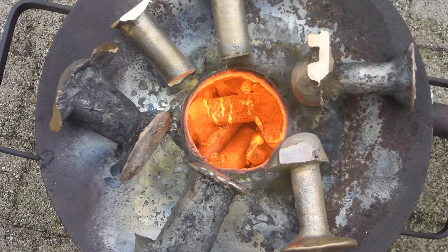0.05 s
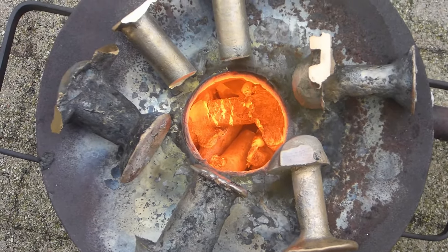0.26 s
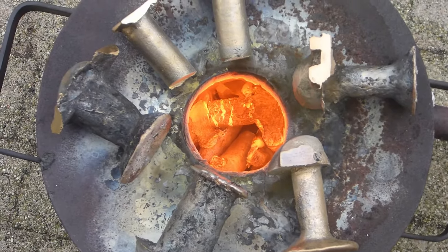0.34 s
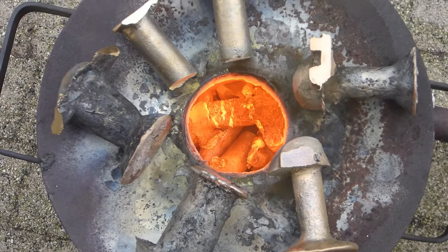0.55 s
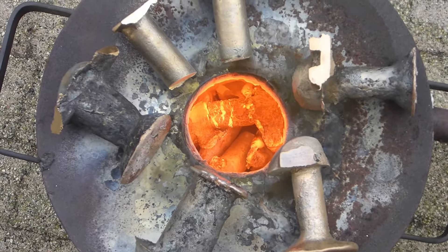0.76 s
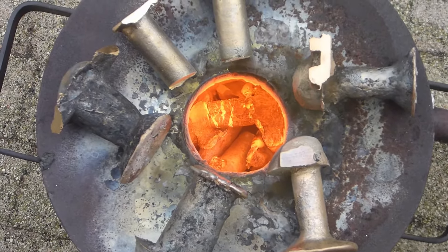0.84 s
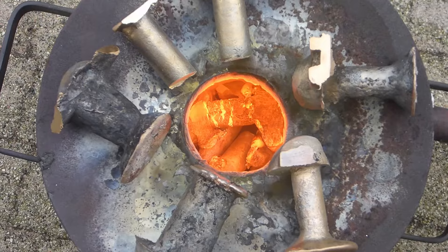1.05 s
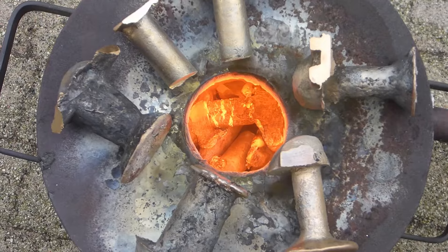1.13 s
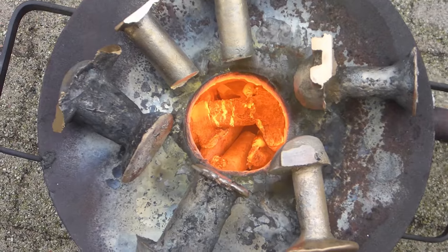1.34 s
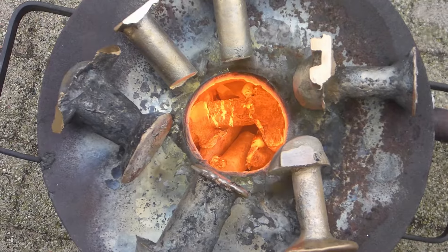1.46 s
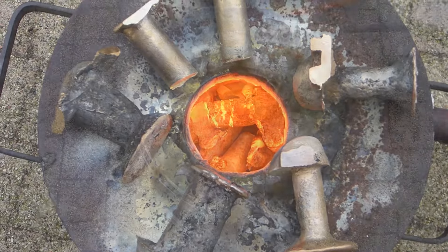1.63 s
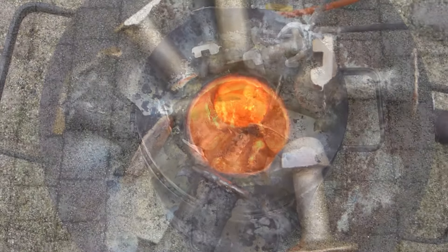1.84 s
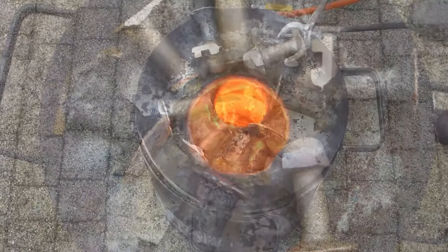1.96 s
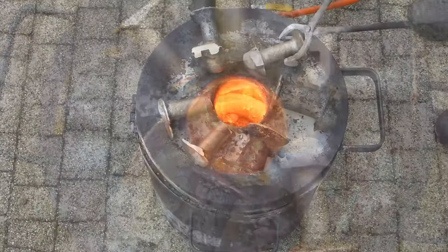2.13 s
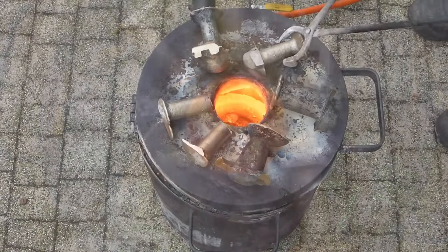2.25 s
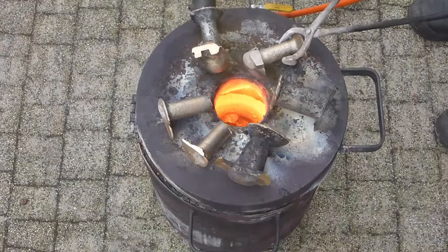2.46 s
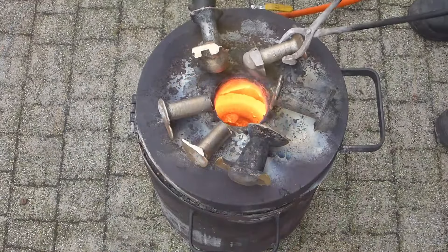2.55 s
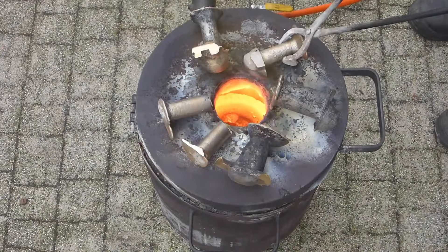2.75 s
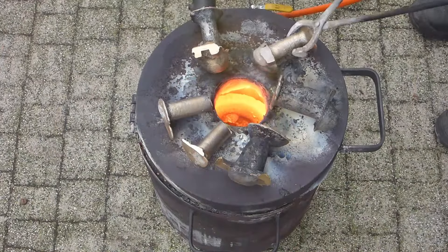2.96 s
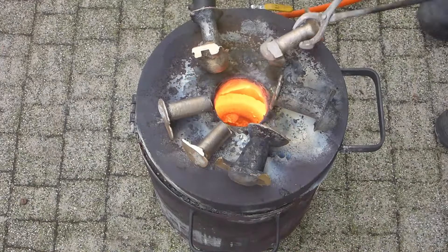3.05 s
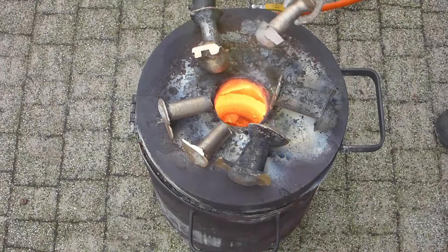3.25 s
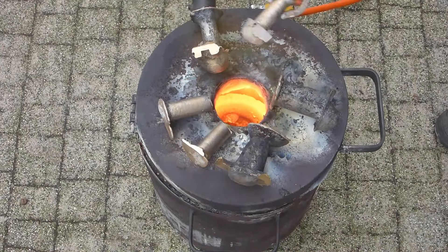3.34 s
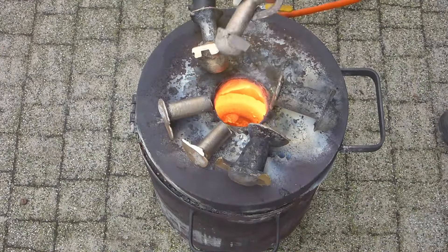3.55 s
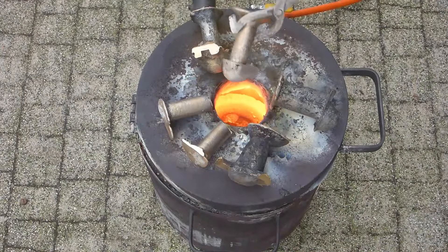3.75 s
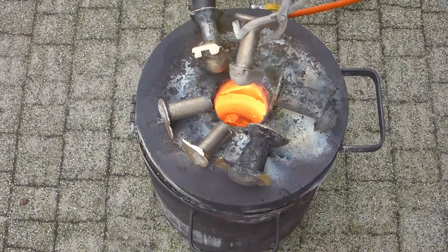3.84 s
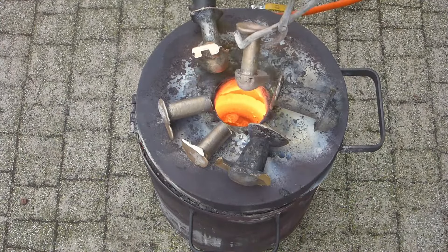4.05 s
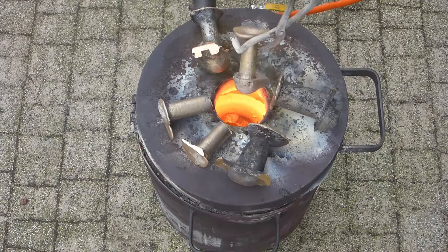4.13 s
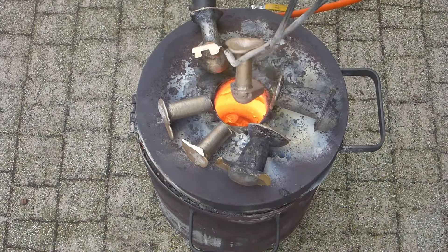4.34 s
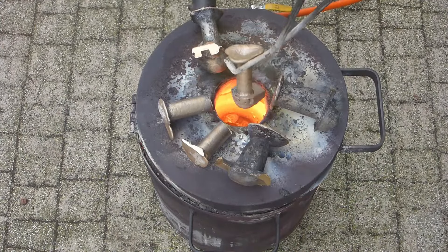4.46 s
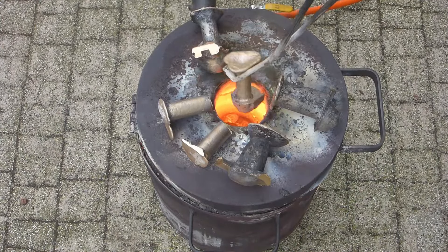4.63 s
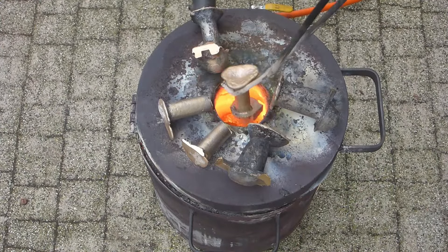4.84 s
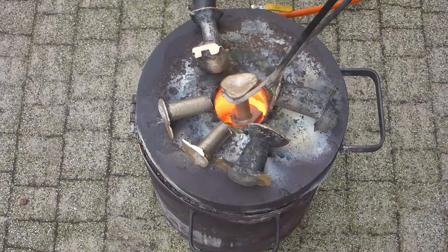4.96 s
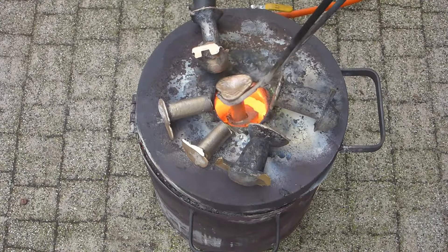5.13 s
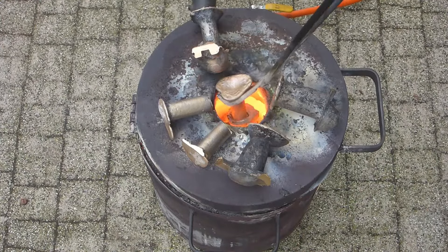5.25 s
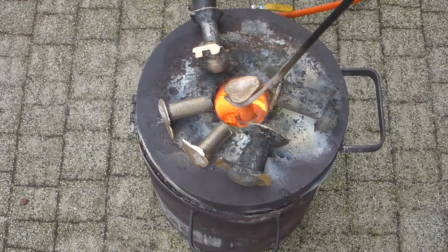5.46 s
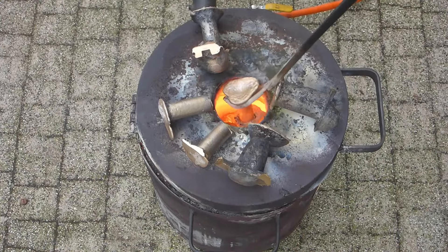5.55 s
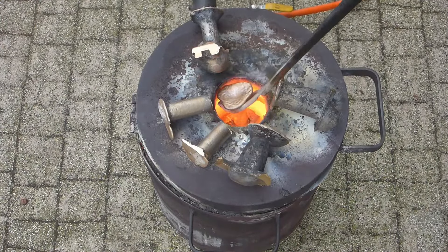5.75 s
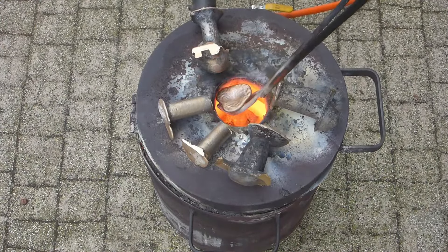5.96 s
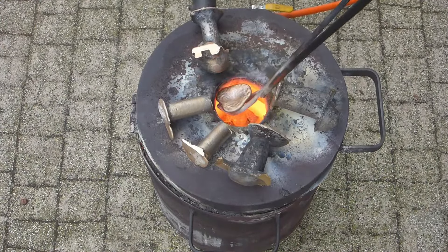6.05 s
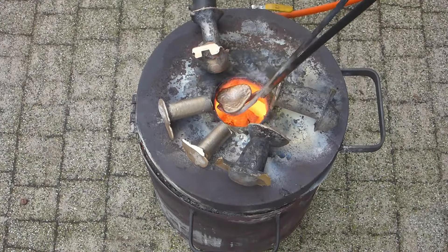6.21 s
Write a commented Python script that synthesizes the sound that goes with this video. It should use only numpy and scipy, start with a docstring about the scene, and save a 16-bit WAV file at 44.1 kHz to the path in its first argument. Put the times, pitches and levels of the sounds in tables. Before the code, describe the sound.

A gas burner roars without pause in a small steel furnace in a paved yard. The microphone is first right above the lid opening, where the boom is deep and smooth, then blends to a step back at about two seconds, with more rasp. A short gritty metal scrape comes near four seconds and a dull double tong knock just after five. Soft jet hiss and very faint bird chirps lie around it.

```python
"""A gas burner roars in a small steel furnace: the flame booms and rasps out of the lid hole as shaped
noise, with one changing rebound. It is heard first right over the lid, then a step back. The gas jet rings
the burner tube, hisses and whistles as filtered noise. Scrap scrapes on the lid and tongs tick as noise
through the iron's damped modes. A small bird calls faintly with rising sine pairs and short echoes."""
import sys
import numpy as np
from scipy import signal
from scipy.fft import rfft, irfft, next_fast_len
from scipy.io import wavfile
from scipy.ndimage import uniform_filter1d, minimum_filter1d

SR = 44100
rng = np.random.default_rng(int(sys.argv[2]) if len(sys.argv) > 2 else 0)


def put_to_file(sound):
    """Save the sound as 16-bit audio at rate SR, in the file named by the first command-line argument."""
    columns = np.atleast_2d(sound).T  # one column per channel
    safe = np.clip(columns, -1, 1)
    whole_steps = np.round(safe * 32767)
    wavfile.write(sys.argv[1], SR, whole_steps.astype(np.int16))


N = 440549
TIME, BINS = np.arange(N) / SR, np.fft.rfftfreq(next_fast_len(N), 1 / SR)  # s, Hz

# Listening place: t/s, nearness (1 over the lid, 0 a step back), left minus right of the boom/dB
PLACE = [(0, 1, -.1), (1.65, 1, -.1), (2.2, 0, 1.9), (2.8, 0, 1.8), (4.2, 0, .8), (5.4, 0, 0),
         (9.99, 0, -.1)]

# Bird calls: t/s, level/dB, length/s, pitch approached f/Hz
BIRD_CALLS = [(1.879, -56, .014, 6800), (3.3075, -43, .015, 6700), (6.4238, -38.5, .023, 7600),
              (7.458, -50, .015, 6700), (9.7125, -46.5, .015, 6700)]
# Call paths, direct, off paving, off walls: delay/s, level/dB
BIRD_PATHS = [(0, 0), (.0013, -9), (.0037, -10), (.0105, -19), (.031, -14), (.035, -17)]

# Scrap touching the lid: t/s, level before trim/dB, decay t60/s, favoured f/Hz
SCRAPES = [(1.9645, -42, .025, 2000), (3.8552, -32, .04, 2800), (3.8578, -29, .025, 6300),
           (3.8605, -33, .05, 1800), (3.861, -37, .07, 11500), (3.8635, -30.5, .035, 5200),
           (3.8695, -30, .045, 2100), (3.87, -38, .03, 9500), (3.874, -33, .035, 4000)]
# Modes of the scrap: f/Hz, width/Hz, level/dB
SCRAP_MODES = [(1400, 400, -7), (1950, 170, 0), (2240, 110, 0), (3520, 240, -2), (4000, 170, -4),
               (4400, 120, -1), (5500, 100, -5), (6710, 300, 0), (7150, 150, -1), (8100, 400, -7),
               (10500, 900, -6), (11800, 700, -5)]
# Tongs knocking and shifting: t/s, level before trim/dB, decay t60/s, favoured f/Hz
KNOCKS = [(2.6535, -32, .022, 1300), (2.93, -42, .06, 1900), (2.958, -36, .04, 1500),
          (2.9585, -36.5, .04, 2700), (3.0975, -30, .025, 1650), (5.2222, -29.5, .04, 1450),
          (5.2232, -37, .05, 6500), (5.2265, -26.5, .035, 2550), (5.2315, -35.5, .035, 4200),
          (6.4085, -41, .045, 2000), (8.2295, -41, .02, 11000)]
# Modes of the tongs: f/Hz, width/Hz, level/dB
TONGS_MODES = [(1250, 250, -4), (1610, 170, -3), (2030, 170, -3), (2550, 170, 0), (3050, 450, -7),
               (3450, 250, -9), (4050, 170, -5), (4400, 250, -9), (5500, 400, -14), (6750, 500, -7),
               (12600, 1400, -14)]
# Tongs dragging over the rim, one row: middle t/s, 1/e width/s, level/dB, grain rate/(1/s)
TONGS_DRAG = (8.213, .11, -52.5, 260)
BLOW_DB_PER_OCTAVE = 13  # loss away from the favoured pitch

# Air resonances of the tube: f/Hz, width/Hz, level a step back/dB, level over the lid/dB; before ring trim
TUBE_MODES = [(1625, 66, -6, -7), (2257.7, 68, -7.5, -5.5), (2830, 190, -9.5, -16),
              (3291, 165, -8.5, -11.5), (3903, 170, -11, -10), (4480, 66, -16, -12.5),
              (5470, 170, -26.5, -26.5)]
# Rush between the resonances: f/Hz, relative density/dB
RUSH_SPECTRUM = [(500, -14), (1300, -3), (1900, -11), (2600, -15), (3600, -19.5), (4250, -14.5),
                 (4900, -20), (5600, -20.5), (7000, -35.5), (10000, -63)]
# Nozzle hiss: f/Hz, relative density/dB
HISS_SPECTRUM = [(3000, -30), (5100, -18), (5400, -12), (5900, -9), (6450, 0), (7000, 0), (7400, -5.5),
                 (7580, -3), (7780, -9.5), (8100, -12), (9700, -11), (10600, -13), (11500, -8.5),
                 (12700, -21), (13350, -17), (13800, -32), (15000, -36)]
# Jet laws, one row each: level/dB, change over the lid/dB, flame slope/(dB/dB), surge slope/(dB/dB)
RUSH_LAW = (-54, 1.5, 0.53, 0.86)
HISS_LAW = (-59, -4, 0.67, 1.5)
WHISTLE_LAW = (-63.5, 0, 0.5, 0.9)
# Gas flow surges and lulls: crest t/s, 1/e width/s, strength before the slopes/dB
SURGES = [(0.018, 0.18, 4), (0.603, 0.14, 3), (.95, .25, -1.5), (1.172, 0.16, 3), (1.803, 0.28, -2),
          (2.44, 0.24, 1.5), (2.921, .18, 2), (3.208, 0.094, -3), (3.6, 0.68, 2.2), (3.981, .1, 3.5),
          (4.743, 0.7, 3), (5.55, 0.92, 1.5), (6.25, 0.61, 2), (7.09, .14, 2), (7.678, .1, 1),
          (8.197, 0.14, 2), (8.62, 0.15, -1.5), (9.872, 0.22, 3.5)]
# One tube resonance sings out or fades: crest t/s, 1/e width/s, strength/dB, f/Hz
SINGS = [(.24, .09, 5, 2259), (.575, .09, 5.5, 4475), (.585, .08, 4, 3897), (.65, .14, 7.5, 3287),
         (1.15, .2, -3, 4475), (1.2, .1, 3, 3897), (1.24, .15, 6.5, 3287), (1.41, .1, 6, 4475),
         (1.61, .1, 4, 4475), (2.45, .45, 3.5, 2820), (3.35, .4, -3, 2820), (3.5, .12, 5, 4475),
         (4.12, .1, -5, 2259), (4.69, .08, 4, 3897), (5.15, .8, 4, 2820), (5.85, .3, -3, 2820),
         (7.33, .1, 4, 1628), (8.06, .12, 4, 3897)]
# Jet locks into a louder whistle: start t/s, length/s, level before trim/dB
FLARES = [(0.016, 0.064, -52), (0.579, 0.042, -54), (2.45, 0.037, -54), (2.648, 0.032, -56),
          (3.524, 0.093, -53), (4.025, 0.046, -51), (4.23, 0.064, -57), (4.693, 0.046, -57),
          (5.988, 0.15, -53.5), (6.37, 0.093, -55), (6.554, 0.11, -57), (7.203, 0.03, -53),
          (8.138, 0.041, -56), (9.793, 0.03, -55)]
WHISTLE_HZ, WHISTLE_WIDTH_HZ, FLARE_EDGE_S = 11005, 85, .02
CREST_HZ, OFF_CREST_DB = 3900, 10.5  # over the lid a surge drives this pitch most; loss per octave away
WAVER_DB = 1.9  # rms waver of each resonance

# Flame: t/s, boom level/dB, rasp level/dB; both before trim
FLAME = [(0, -11.5, -35), (1.5, -12, -36.5), (1.8, -13.5, -39), (2.05, -15, -31.5), (2.5, -9.5, -28),
         (3.1, -10.5, -28), (3.35, -12.5, -31), (3.85, -12.5, -30.5), (4.7, -11, -33.5), (5, -12.5, -37),
         (5.35, -12, -32.5), (5.95, -13.5, -35), (6.4, -12.5, -31), (7.7, -12, -32.5), (8.2, -13, -29.5),
         (8.72, -14.5, -35.5), (9.2, -11, -32), (9.99, -13, -31.5)]
# Roar over the lid: f/Hz, relative density/dB
ROAR_NEAR = [(20, -43), (45, -42), (64, -26), (95, -9.5), (125, -6), (200, 2), (280, 0.5), (370, -4.5),
             (520, -15.5), (700, -21.5), (860, -31.5), (1000, -32.5), (1180, -46), (2000, -62)]
# Roar a step back: f/Hz, relative density/dB
ROAR_FAR = [(20, -43.5), (42, -41.5), (60, -27), (78, -15.5), (102, -3.5), (124, -5.5), (165, 1.3),
            (210, 2.0753), (280, 2.37), (335, -2.5), (430, -5), (570, -14), (640, -14.5), (770, -19),
            (880, -25), (1080, -27.5), (1265, -48), (2200, -64)]
# Rebound from a nearby surface: t/s, delay/ms, strength 0-1
REBOUND = [(0, 2.9, .2), (1.7, 2.9, .2), (2.2, 2.1, .22), (3.15, 2.1, .18), (3.5, 2.7, .25),
           (3.9, 2.92, .42), (4.7, 2.8, .42), (5.2, 2.6, .38), (5.7, 2.5, .38), (6.2, 2.2, .24),
           (7.1, 1.8, .24), (7.6, 1.8, .1), (8.3, 2, .18), (8.6, 1.5, .06), (9, 1.18, .44),
           (9.99, 1.15, .54)]
# Flame booms up or sinks: crest t/s, 1/e width/s, strength/dB, f/Hz
BOOMS = [(.7, 0.3, 2, 290), (1.42, .3, 2, 210), (1.88, 0.26, -5.5, 100), (3.07, 0.2, 3.5, 105),
         (3.45, 0.49, 2.5, 400), (3.9, 0.54, 2, 268), (4.7, .35, 0.5, 390), (4.95, .4, 1.5, 100),
         (5.75, 0.61, 3.5, 119), (6.55, 0.31, 2.5, 166), (7.2, 0.24, 3.5, 163), (8.27, 0.15, 5, 115),
         (8.72, 0.38, -3, 100.5), (9.93, 0.89, 4, 313)]
# Hollow drifting through the roar (negative depth lifts): t/s, f/Hz, depth/dB
HOLLOW = [(1.9, 140, 0.5), (2.6, 145, 3.5), (3.1, 175, 0), (4.2, 180.8, 1.5), (4.8, 257, 3.5),
          (5.6, 295, 1.5), (6.4, 290, 2), (7.4, 257.4, -0.5), (8.3, 188, -2.5), (9, 137, 2), (9.45, 186, 2),
          (9.99, 200, 3)]

NOTCH_HZ, NOTCH_WIDTH_HZ, EDGE_HZ = 8980, 1100, 14800


def amp(db):
    """Linear gain from dB."""
    return 10 ** (np.asarray(db) / 20)


def unit(x):
    """Scales to rms 1."""
    return x / np.sqrt(np.mean(x ** 2) + 1e-20)


def follow(rows):
    """Columns of a curve, sample by sample."""
    s, *columns = np.transpose(rows)
    return [np.interp(TIME, s, column) for column in columns]


def slope(points):
    """Gain on BINS from (Hz, dB) points, over log frequency."""
    hz, db = np.transpose(points)
    return amp(np.interp(np.log(BINS + 1), np.log(hz), db))


def peaks(modes, hz):
    """Gain over frequency of a set of resonances, powers summed."""
    power = 0
    for f_hz, width_hz, db in modes:
        power = power + amp(db) ** 2 / (1 + ((hz - f_hz) / (.7 * width_hz)) ** 2) ** 1.5
    return np.sqrt(power)


def colour(x, gain):
    """Filters x by a gain given on BINS."""
    return irfft(rfft(x, next_fast_len(N)) * gain)[..., :N]


def noise(gain, likeness):
    """Coloured turbulence, rms 1, at two microphones that hear partly the same."""
    shared, differing = rng.standard_normal((2, len(BINS))) + 1j * rng.standard_normal((2, len(BINS)))
    side = differing * np.sqrt(np.clip((1 - likeness) / (1 + likeness), 0, 1))
    return unit(irfft(gain * np.array([shared + side, shared - side]))[:, :N])


def flutter(rate_hz):
    """Random unsteadiness, rms 1, from about 3 Hz up to about rate_hz."""
    steps = rng.standard_normal(N // 64)
    hz = np.fft.rfftfreq(len(steps), 64 / SR)
    slow = irfft(rfft(steps) * hz / (hz + 3) / np.sqrt(1 + (hz / rate_hz) ** 4))
    return unit(np.interp(np.linspace(0, 1, N), np.linspace(0, 1, len(slow)), slow))


def pan(lean_db):
    """Left and right gains for a left-minus-right level."""
    return amp(np.array([[.5], [-.5]]) * lean_db)


def add(mix, s, sound):
    """Adds a sound into the mix from time s."""
    part = mix[round(s * SR):][:len(sound)]
    part += sound[:len(part)]


def hump(x, centre, width):
    """Gaussian hump of height 1 and full 1/e width."""
    return np.exp(-(2 * (x - centre) / width) ** 2)


def swell(x, rows, octaves, hollow=None, hollow_octaves=.6):
    """Swells or sinks x around a pitch at a time; optionally carves a drifting hollow."""
    hz, t, z = signal.stft(x, SR, nperseg=2048, noverlap=1536)
    pitch = np.log2(hz + 1)[:, None]
    field_db = 0
    for s, length_s, db, f_hz in rows:
        field_db = field_db + db * hump(t, s, length_s) * hump(pitch, np.log2(f_hz), octaves)
    if hollow is not None:
        s, f_hz, depth_db = np.transpose(hollow)
        hollow_pitch = np.interp(t, s, np.log2(f_hz))
        field_db = field_db - np.interp(t, s, depth_db) * hump(pitch, hollow_pitch, hollow_octaves)
    return signal.istft(z * amp(field_db), SR, nperseg=2048, noverlap=1536)[1][:, :N]


def bird():
    """Upward flicks of two voices, loudest at the throat resonance and smeared by yard echoes."""
    start_hz, rise_s, second_ratio, second_db = 4700, .0042, 1.11, -6
    throat_hz, throat_width_hz = 6450, 2000
    out = np.zeros(N)
    for s, db, length_s, top_hz in BIRD_CALLS:
        t = np.arange(0, length_s, 1 / SR)
        glide_hz = top_hz + (start_hz - top_hz) * np.exp(-t / rise_s)
        voices = 0
        for hz, voice_db in [(glide_hz, 0), (second_ratio * glide_hz, second_db)]:
            throat = peaks([(throat_hz, throat_width_hz, voice_db)], hz)
            voices = voices + throat * np.sin(2 * np.pi * np.cumsum(hz) / SR)
        call = np.sin(np.pi * (t / length_s) ** 0.57) * voices
        for delay_s, path_db in BIRD_PATHS:
            add(out, s + delay_s, amp(db + path_db) * call)
    return out * pan(-1.5)


def touches(rows, modes, trim_db):
    """Short gritty scrapes: random-phase noise shaped by the iron's damped modes, decaying."""
    t, hz = np.arange(4096) / SR, np.fft.rfftfreq(4096, 1 / SR)
    out = np.zeros(N)
    for s, db, t60_s, blow_hz in rows:
        grit = np.exp(2j * np.pi * rng.random(len(hz)))
        blow = amp(-BLOW_DB_PER_OCTAVE * abs(np.log2((hz + 1) / blow_hz)))
        ring = unit(irfft(grit * peaks(modes, hz) * blow))
        onset = 1 - np.exp(-t / .0003)
        add(out, s, ring * amp(db + trim_db - 60 * t / t60_s) * onset)
    return out * pan(-2.0)


def tongs_drag(centre_hz=2500, octaves=3):
    """Iron sticks and slips over the rim: a loose crackle of uneven grains through the tongs' modes."""
    s, length_s, db, rate_hz = TONGS_DRAG
    slips = rng.random(N) < rate_hz / SR
    grains = slips * rng.uniform(.3, 1, N) * rng.choice([-1, 1], N)
    band = hump(np.log2(BINS + 1), np.log2(centre_hz), octaves)
    ring = colour(grains, peaks(TONGS_MODES, BINS) * band)
    return unit(ring) * hump(TIME, s, length_s) * amp(db) * pan(-2.0)


def metal():
    """Scrap scraping on the lid, tongs knocking, tongs dragging."""
    scrapes = touches(SCRAPES, SCRAP_MODES, trim_db=-7.5)
    knocks = touches(KNOCKS, TONGS_MODES, trim_db=-6)
    return scrapes + knocks + tongs_drag()


def surges(late_s=0):
    """Gas flow in dB: each surge or lull is one smooth hump."""
    t = TIME[::64]
    flow_db = sum(db * hump(t, s, length_s) for s, length_s, db in SURGES)
    return np.interp(TIME - late_s, t, flow_db)


def jet_level(law, rasp_share=0.35):
    """Level in dB of one jet sound: it swells with the flame it feeds and with every surge."""
    level_db, near_db, per_flame, per_surge = law
    low_db, upper_db = follow(FLAME)
    near, _ = follow(PLACE)
    share = rasp_share * (1 - near)  # over the lid only the boom counts
    boom_part_db = (1 - share) * (low_db - low_db.mean())
    rasp_part_db = share * (upper_db - np.median(upper_db))
    flame_db = boom_part_db + rasp_part_db
    return level_db + near_db * near + per_flame * flame_db + per_surge * surges()


def tube(wash_db=-1.1, near_wash_db=-5, flare=1.2, calm_db=3.0, lag_s=0.078, ring_db=-0.45):
    """The rush rings the tube's air; each mode wavers alone, and a dying surge slides down through them."""
    near, _ = follow(PLACE)
    wall_loss = 1 / (1 + (BINS / 8500) ** 8)  # the tube swallows the top treble
    out = noise(slope(RUSH_SPECTRUM) * wall_loss, likeness=.62) * amp(wash_db + near_wash_db * near)
    for hz, width_hz, far_db, near_db in TUBE_MODES:
        ring = noise(peaks([(hz, width_hz, 0)], BINS), likeness=0.78)
        late_s = lag_s * np.log2(CREST_HZ / hz)  # lower resonances answer later, lag_s per octave
        drive = flare * amp(-OFF_CREST_DB * abs(np.log2(hz / CREST_HZ)))
        surge_db = drive * (surges(late_s) - calm_db)
        place_db = far_db + near * (near_db - far_db + surge_db)
        out += ring * amp(ring_db + place_db + WAVER_DB * flutter(7.2))
    return out * amp(jet_level(RUSH_LAW)) * pan(-3.8 - 3 * near)


def whistle_gain(wander_db=3, flicker_db=1.0, flare_db=-1, flare_flicker_db=2.0):
    """The whistle wanders at random and holds louder through each flare."""
    idle = amp(jet_level(WHISTLE_LAW) + wander_db * flutter(7) + flicker_db * flutter(30))
    flares = 0
    for s, length_s, db in FLARES:
        inside_s = np.minimum(TIME - s, s + length_s - TIME)  # time to the nearer end
        flares = flares + amp(db) * np.clip(.5 + inside_s / FLARE_EDGE_S, 0, 1)
    return np.hypot(idle, flares * amp(flare_db + flare_flicker_db * flutter(30)))


def gas(gust_db=0.5, hiss_flicker_db=0.95, hiss_wander_db=1.44):
    """The jet rushes in the tube, hisses at the nozzle and whistles unsteadily."""
    near, _ = follow(PLACE)
    gusts = gust_db * flutter(25)  # one unsteady flow drives hiss and whistle
    hiss_db = jet_level(HISS_LAW) + gusts + hiss_flicker_db * flutter(30) + hiss_wander_db * flutter(6.7)
    hiss = noise(slope(HISS_SPECTRUM), likeness=0.76) * amp(hiss_db) * pan(-4 - 1.5 * near)
    whistle = noise(peaks([(WHISTLE_HZ, WHISTLE_WIDTH_HZ, 0)], BINS), likeness=0.75)
    whistle = whistle * whistle_gain() * amp(gusts) * pan(-1.5)
    return swell(tube(), SINGS, octaves=0.24) + hiss + whistle


def rebound(direct, low_hz=195, high_hz=1200):
    """A small rough surface returns the middle wavelengths; the changing delay cuts moving notches."""
    delay_ms, strength = follow(REBOUND)
    returned = colour(direct, 1 / (1 + (low_hz / (BINS + 1)) ** 4 + (BINS / high_hz) ** 4))
    delayed = [np.interp(TIME - delay_ms / 1000, TIME, side) for side in returned]
    return strength * np.array(delayed)


def flame(boom_db=-0.25, rasp_db=1, flicker_db=1.5, gust_db=0.8):
    """Turbulent burning booms in the chamber and rasps out of the lid hole."""
    low_db, upper_db = follow(FLAME)
    near, lean_db = follow(PLACE)
    upper_share = 1 / (1 + (580 / (BINS + 1)) ** 8)
    lining_loss = 1 / (1 + (BINS / 7500) ** 6)  # the furnace lining swallows the treble
    rasp_likeness = 1 - .25 / (1 + (950 / (BINS + 1)) ** 5)  # shorter waves differ more between microphones
    boom_gain = amp(low_db + boom_db) * pan(lean_db)
    rasp_gain = amp(upper_db + rasp_db + flicker_db * flutter(90) + gust_db * flutter(9))
    rasp_gain = rasp_gain * pan(2.7 * lean_db - .5)  # shorter waves are more directional
    direct = np.zeros((2, N))
    for spectrum, share in (ROAR_NEAR, near), (ROAR_FAR, 1 - near):
        boom = noise(slope(spectrum) * np.sqrt(1 - upper_share), likeness=.9995)
        rasp = noise(slope(spectrum) * np.sqrt(upper_share) * lining_loss, likeness=rasp_likeness)
        direct += np.sqrt(share) * (boom * boom_gain + rasp * rasp_gain)
    return direct + rebound(direct)


def scene():
    """The bird, the metal being handled, the gas jet and the flame's roar."""
    roar = swell(flame(), BOOMS, octaves=0.99, hollow=HOLLOW)
    return bird() + metal() + gas() + roar


def record(dry):
    """Narrow treble dip of the microphone, smooth limiter on the highest crests, band limit."""
    off_notch_hz = BINS - NOTCH_HZ
    heard = colour(dry, abs(off_notch_hz) / np.hypot(off_notch_hz, NOTCH_WIDTH_HZ / 2))
    allowed_gain = np.minimum(1, .92 / (abs(heard).max(axis=0) + 1e-9))
    held_gain = minimum_filter1d(allowed_gain, size=801)
    gain = uniform_filter1d(uniform_filter1d(held_gain, size=401), size=401)
    low_pass = signal.firwin(511, EDGE_HZ, window=("kaiser", 9), fs=SR)
    return signal.oaconvolve(heard * gain, low_pass[None], "same")


dry = scene()
out = record(dry)
put_to_file(out)
```